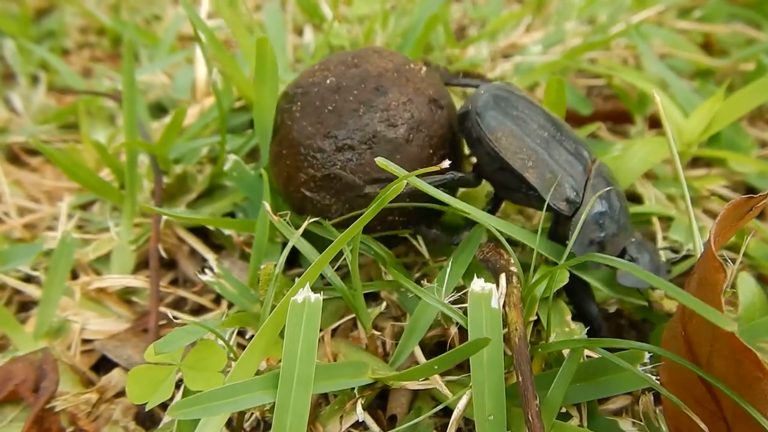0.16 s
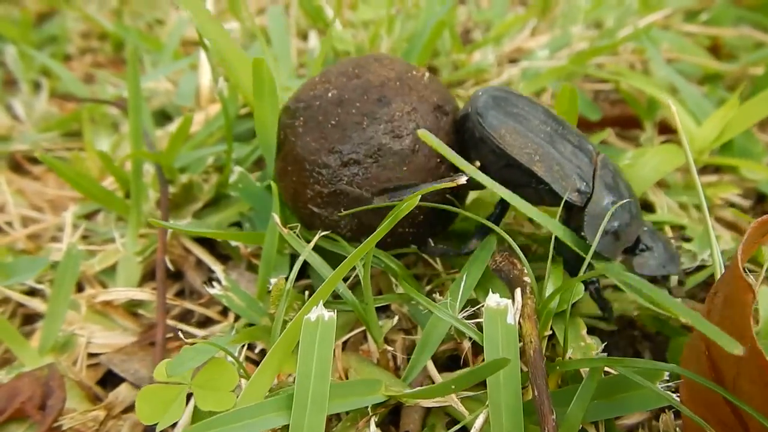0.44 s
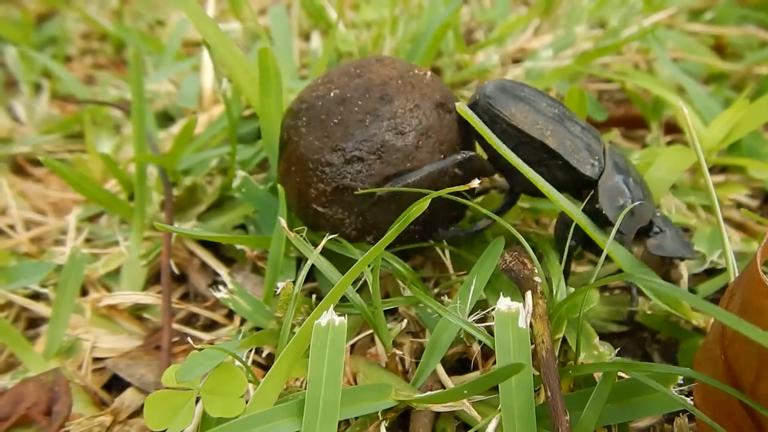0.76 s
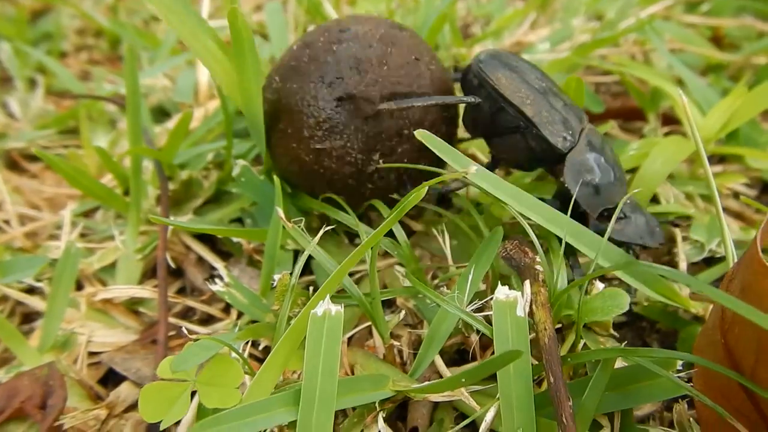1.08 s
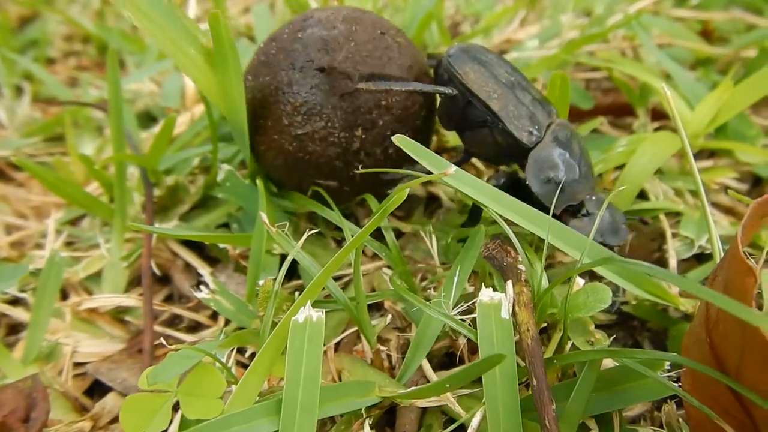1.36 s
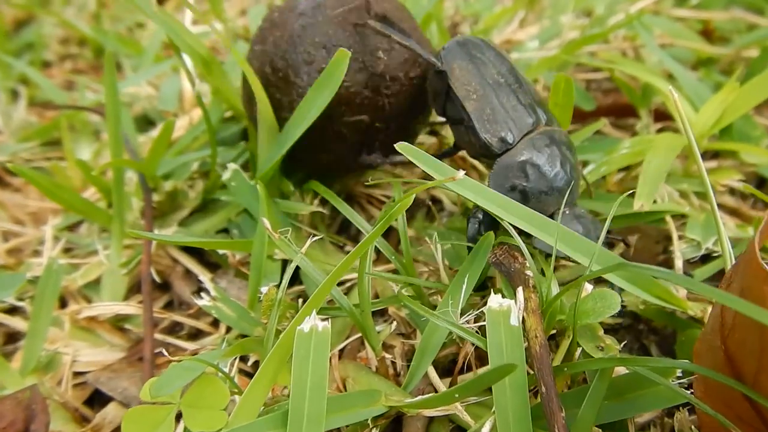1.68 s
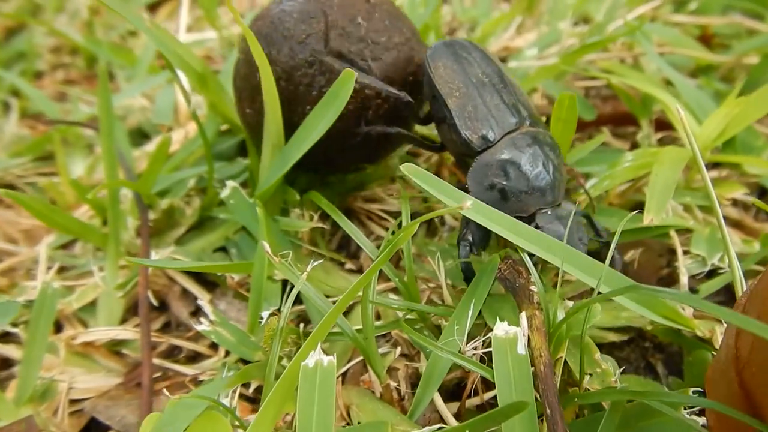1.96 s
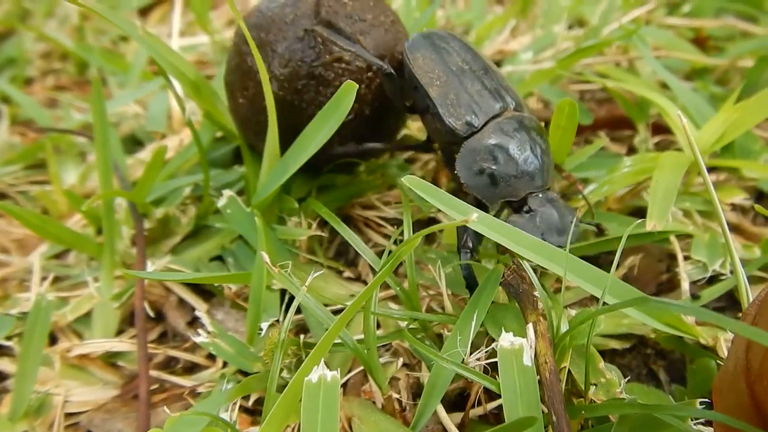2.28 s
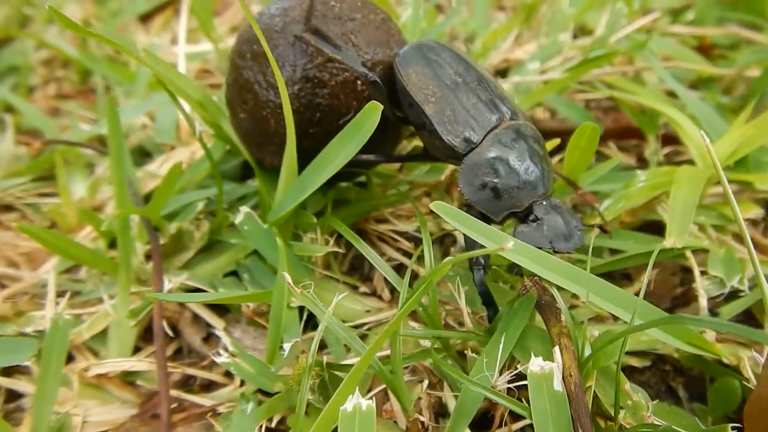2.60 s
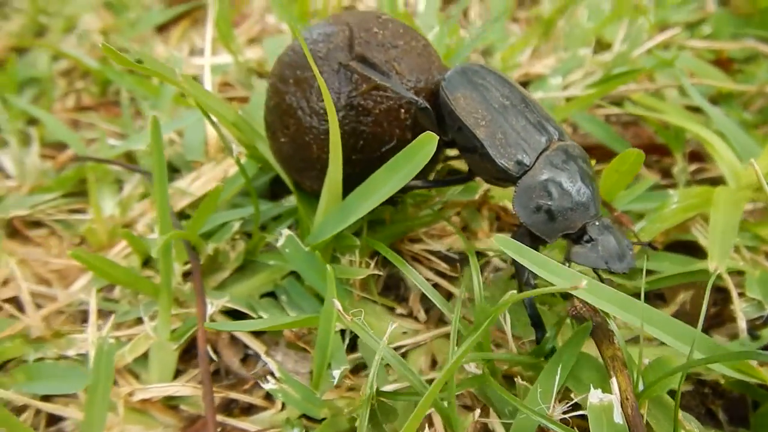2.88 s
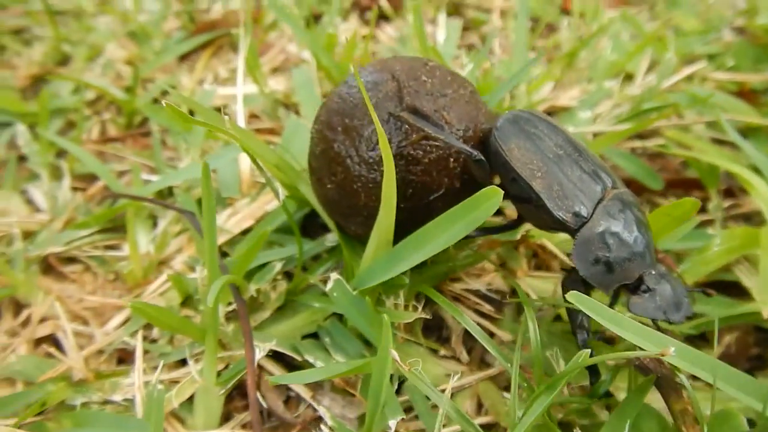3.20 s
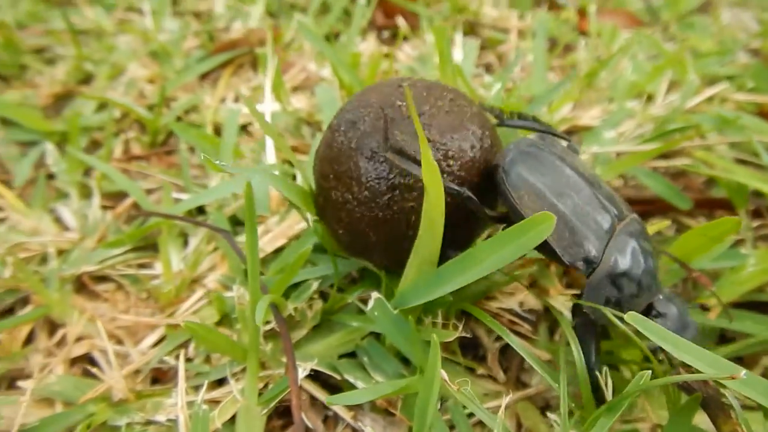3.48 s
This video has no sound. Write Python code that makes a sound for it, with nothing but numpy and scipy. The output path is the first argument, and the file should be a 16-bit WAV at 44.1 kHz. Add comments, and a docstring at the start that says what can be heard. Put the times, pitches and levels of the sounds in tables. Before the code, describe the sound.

Close to a lawn, dry grass ticks, rustles and scrapes under a beetle pushing its ball; low wind rumbles softly, a brief gust bumps the microphone after one second, and a high insect buzz swells last.

```python
"""Lawn with dung beetle and insects

Close to a lawn where a dung beetle rolls its ball. Low wind, rumble and fine hiss are coloured noise;
a gust buffets the microphone amid soft low bumps. Dry grass ticks, tocks, rustles and scrapes: clicks through
resonances, plus gritty noise. A wavering sine hums far off. In the treble: a faint chorus of band noise,
a thin gliding tone, then a nearer insect swelling into a fast, high buzz of pulses."""
import sys
import numpy as np
from scipy import signal
from scipy.fft import rfft, irfft, next_fast_len
from scipy.io import wavfile

SR = 44100
rng = np.random.default_rng(int(sys.argv[2]) if len(sys.argv) > 2 else 0)


def dump_mix(stems):
    """Bounce the given channels to the path in sys.argv[1] as a 16-bit WAV at rate SR."""
    frames = np.atleast_2d(stems).T  # one column per channel
    limited = np.clip(frames, -1, 1)  # hard clip at full scale
    pcm = np.round(limited * 32767).astype(np.int16)
    wavfile.write(sys.argv[1], SR, pcm)


N = 160965

# Noise spectra are relative: (frequency [Hz], density [dB per Hz])
# Left-right correlation of noise: (frequency [Hz], correlation [-1..1])
STEREO_CORRELATION = [(25, 1), (80, 0.89), (160, 0.95), (350, 0.7), (800, 0.62), (2500, 0.27), (6000, 0.39),
                      (12000, 0.035)]

# Steady outdoor air: (frequency [Hz], density [dB per Hz])
AIR_SPECTRUM = [(12, -60), (20, -6), (49, -8.5), (87, -2), (311, -12.5), (370, -16), (570, -21.5),
                (823, -24), (1380, -33), (1610, -36), (2480, -37.5), (3500, -38.5), (4550, -51.5),
                (7700, -120)]
# Fine hiss: (frequency [Hz], density [dB per Hz])
HISS_SPECTRUM = [(1500, -23), (2900, -3.5), (3500, -21.5), (4100, -13), (4700, 1.5), (5250, 5.5),
                 (6500, -3.5), (7400, -10), (8400, -20.5), (10500, -22), (15500, -24.5)]
AIR_DB, HISS_DB = -49, -66
# Low wind, relative to AIR_DB: (time [s], level [dB])
BREEZE_LEVEL = [(0, 1.5), (.3, -1), (.55, -1), (.74, 0), (.95, -0.5), (1.3, 1), (1.5, -1.5), (1.63, 2),
                (1.8, -1), (2.3, 0.5), (2.7, 2), (3.15, 0.5), (3.65, 2.5)]
# Gusts on the microphone: (time [s], level [dB], hold including attack [s], fade by 60 dB [s])
GUSTS = [(1.085, -34, 0.054, 0.5)]
GUST_ATTACK_S = 0.012
# Gust: (frequency [Hz], density [dB per Hz])
GUST_SPECTRUM = [(20, -22), (35, -3), (65, -3.5), (110, 2.5), (190, -6), (280, -19), (600, -63),
                 (2000, -79)]

# Deep rumble of air on each microphone port: (time [s], level [dB])
RUMBLE_LEVEL = [(0, -68), (1.0, -76), (1.15, -60), (1.4, -75), (1.95, -53.5), (2.3, -66), (3.2, -59.5),
                (3.45, -42.5), (3.65, -49)]
# Rumble: (frequency [Hz], density [dB per Hz])
RUMBLE_SPECTRUM = [(15, 11.5), (25, -18), (42, -1), (65, -3), (130, -33), (500, -62)]

# Far hum: (time [s], level [dB])
HUM_LEVEL = [(0, -76), (.7, -54.5), (1.2, -76), (2.1, -70), (2.35, -53.5), (2.65, -50), (3.0, -59.5),
             (3.65, -51)]
HUM_HZ, HUM_WANDER_FRACTION = 83.3, 0.0243

# Far insect chorus: (frequency [Hz], density [dB per Hz])
CHORUS_SPECTRUM = [(6200, -49), (6900, -1), (7200, 3), (7700, 0), (8100, -19), (8550, -16), (8900, -30)]
# Chorus: (time [s], level [dB])
CHORUS_LEVEL = [(0, -78), (.6, -85), (.8, -86), (1.05, -80), (1.55, -73), (1.8, -77), (2.35, -79),
                (2.6, -78), (3.65, -73)]
CHORUS_WAVER_DB = 1.5

# Rustle of the blades: (time [s], crisp level [dB], scuff level [dB])
RUSTLE_LEVELS = [(0, -72, -73), (.25, -65, -65), (.65, -69, -69), (.8, -62.5, -67), (1.02, -70, -68),
                 (1.12, -63, -61), (1.22, -66, -61.5), (1.45, -70, -71), (1.8, -67.5, -68.5),
                 (1.96, -61, -58.5), (2.17, -73, -72.5), (2.45, -71, -68.5), (2.6, -65, -63.5),
                 (2.95, -63, -60.5), (3.2, -68, -65), (3.33, -62, -65.5), (3.45, -62.5, -63.5),
                 (3.65, -59.5, -57.5)]
GRAINS_PER_S, GRAIN_SPREAD_DB, GRAIN_PAN_DB = 550, 3.5, 8.5
RUSTLE_PATCHY_DB, RUSTLE_PATCH_RATE_HZ = 3, 20
# Resonances of the rubbing blades: (frequency [Hz], width [Hz], gain [dB])
SCUFF_MODES = [(890, 290, -2), (1115, 240, 0), (1664, 245, 0), (2083, 450, -3.5), (2805, 490, -5)]

# Ticks of grass blades and stalks; levels before TICK_GAIN_DB:
# (time [s], thud level [dB], snap level [dB], crisp level [dB], left minus right [dB],
#  snap pitch ratio [1], crackle t60 [s])
TICKS = [(.051, -64, -56.5, -56, 0, 1.5, .03), (.091, -55, -59.5, -64, 1, 0.78, 0.023),
         (.177, -75, -59, -58, 6, 1.8, 0.026), (.198, -68, -55, -56.5, 2, 1.34, 0.023),
         (0.233, -72, -56, -52, 4, 1.54, 0.057), (0.327, -75, -57.5, -54.5, 2, 1.8, 0.014),
         (.345, -75, -77, -63, 1, 0.94, .02), (.563, -68, -63, -53.5, 1, 1.03, 0.019),
         (0.589, -58, -51.5, -63, -1, 0.79, 0.017), (.812, -64, -55.5, -56, -.5, 1, 0.045),
         (1.066, -62, -58, -49.5, 7, 1.9, 0.038), (1.084, -51, -56.5, -52.5, -1, 1.26, .025),
         (1.096, -58, -65, -48.5, 2.5, 0.77, .03), (1.114, -70, -71, -61, 2, 1.3, .03),
         (1.133, -70, -70, -59, 2, 1.27, 0.017), (1.145, -67, -74, -55.5, 9, 1.7, .035),
         (1.235, -54, -56.5, -53.5, 0, 1.75, 0.014), (1.274, -58, -67, -56.5, 6, 1.27, 0.046),
         (1.376, -73, -67, -56, 9, 1.04, 0.022), (1.517, -75, -56, -52, 1, 0.91, 0.028),
         (1.63, -45.5, -52.5, -59, -6, 0.8, 0.02), (1.863, -53.5, -56, -59.5, 5, 1.5, 0.037),
         (1.911, -67, -70, -53.5, 9, 1, 0.028), (1.937, -49, -65, -54, 1, 0.89, .015),
         (1.965, -56, -73, -54, 7, 1.2, 0.027), (1.985, -48, -55, -69, 0, 0.65, 0.071),
         (2.001, -62, -62, -55, 7, 0.76, 0.029), (2.027, -55, -51.5, -67, 4, 1, 0.042),
         (2.085, -58, -64, -53.5, 2, 0.91, 0.011), (2.11, -54, -53.5, -64, -1, 1, 0.055),
         (2.241, -55, -59, -52, 4, 2.36, 0.015), (2.256, -47.5, -50, -77, -12, 0.55, 0.045),
         (2.471, -64, -72, -59, 7, 1.2, .025), (2.929, -53, -53.5, -56, -5, 1.14, 0.088),
         (2.955, -47, -46.5, -51.5, -2.5, 1.02, 0.027), (3.087, -57, -60, -53, -1, 1.15, 0.068),
         (3.1, -77, -64, -51, 1, 1.1, .07), (3.299, -66, -54, -57, -1.5, 1, 0.079),
         (3.35, -50, -45, -59, -7, 0.88, 0.048), (3.522, -47.5, -56.5, -54.5, 0, 1, .015),
         (3.59, -53, -51, -51.5, -1, 0.72, 0.013), (3.613, -34.5, -47.5, -60, 0, 0.89, .025)]
# Low resonances of the turf: (frequency [Hz], width [Hz], gain [dB])
THUD_MODES = [(285, 170, -3), (474, 290, -2)]
# Middle resonances, before the pitch ratio: (frequency [Hz], width [Hz], gain [dB])
SNAP_MODES = [(890, 200, -2), (1550, 300, -1.5), (2030, 380, -3.5), (2870, 640, -10)]
# High resonances, of ticks and rustle: (frequency [Hz], width [Hz], gain [dB])
CRISP_MODES = [(5060, 516, 10), (6270, 1170, 2.5), (7420, 430, 1.5), (8370, 3100, -19.5)]
TICK_GAIN_DB, TICK_SAMPLES = -8.5, 2048
SPLINTERS_PER_S, SPLINTER_DB, SPLINTER_STEREO_RATIO = 3000, -7.5, 1

# Tocks of dry stalks; levels before TICK_GAIN_DB: (time [s], pitch [Hz], level [dB])
TOCKS = [(.283, 2030, -51.5), (.407, 2350, -58.5), (.515, 1740, -63.5), (2.35, 1640, -58),
         (2.513, 1550, -58), (2.586, 950, -57), (2.689, 1700, -58.5), (2.718, 1640, -64),
         (2.836, 1570, -60), (2.861, 1150, -65), (3.031, 1690, -57), (3.072, 1630, -59),
         (3.318, 1660, -53.5)]
TOCK_WIDTH_HZ, TOCK_CRACKLE_T60_S = 240, .022

# One blade scrapes as the gust arrives: (frequency [Hz], density [dB per Hz])
SCRAPE_SPECTRUM = [(2500, -18), (4400, -22), (5400, 7), (6200, -12), (7600, 0.5), (9000, -10),
                   (10600, -21.5), (12000, -42), (16000, -54)]
SCRAPE_PEAK_S, SCRAPE_DB, SCRAPE_ATTACK_S, SCRAPE_T60_S = 1.097, -44, 0.0064, 0.087

# Soft low bumps: (time [s], pitch [Hz], envelope peak [dB])
BUMPS = [(1.101, 106, -29.5), (1.125, 115, -29), (1.16, 90, -29), (1.195, 83.4, -33.5), (2.65, 202, -38),
         (2.898, 293, -40), (3.257, 285, -35.5), (3.376, 240, -39), (3.407, 83, -32.5), (3.538, 109, -53)]
BUMP_RISE_CYCLES = 0.52

# Far insect: (time [s], pitch [Hz], level [dB])
THIN_TONE = [(2.05, 10080, -104), (2.25, 9930, -96), (2.5, 9940, -91), (2.65, 10000, -102),
             (2.9, 9814, -92.5), (3.2, 9780, -87.5), (3.65, 9630, -85)]
THIN_WANDER_FRACTION = 0.0113

# Near insect, before pan and rasp: (time [s], level [dB])
BUZZ_LEVEL = [(3.0, -86), (3.24, -88), (3.3, -70), (3.335, -69), (3.36, -55.5), (3.385, -71), (3.405, -61),
              (3.42, -63), (3.455, -55.5), (3.5, -56), (3.53, -50), (3.55, -52.5), (3.573, -47.5),
              (3.61, -51.5), (3.635, -48), (3.65, -51)]
# Its pitch, which also sets the pulse rate: (time [s], pitch [Hz])
BUZZ_PITCH = [(3.33, 9640), (3.43, 9400), (3.47, 9540), (3.52, 9640), (3.59, 9620), (3.65, 9440)]
CYCLES_PER_PULSE, PULSE_SLIP_RAD, PULSE_JITTER_FRACTION, PULSE_SPREAD_DB = 22.75, .62, 0.00583, 1.2
BUZZ_PAN_DB, BUZZ_RIGHT_LEAD_S = -5, .000015
# Rasp round the ringing tone: (frequency [Hz], density [dB per Hz])
RASP_SPECTRUM = [(7000, -19), (8500, -12), (9050, -1), (9250, -4), (9800, 3), (10050, -9), (10450, -4),
                 (11300, -19), (11700, -11), (12000, -17), (13200, -52)]
RASP_GAIN, RASP_PAN_DB = 0.36, 12
# Its two upper bands: (frequency [Hz], density [dB per Hz])
OVERTONE_SPECTRUM = [(11450, -28), (11730, -5), (12000, -22), (12300, -4), (12600, -2), (12850, -17),
                     (13200, -45)]
# Upper bands, before pan and pulsing: (time [s], level [dB])
OVERTONE_LEVEL = [(3.0, -110), (3.26, -92), (3.33, -78), (3.45, -73), (3.58, -68.5), (3.65, -69)]
OVERTONE_PAN_DB = 10

# Narrow gaps in the microphone's response: (frequency [Hz], width [Hz])
NOTCHES = [(2500, 178), (5000, 120), (7500, 71)]
CUTOFF_HZ = 15700


def from_db(db):
    """Decibels to gain."""
    return 10 ** (np.asarray(db) / 20)


def rms_one(x):
    """Scale to rms 1."""
    return x / np.sqrt(np.mean(x ** 2) + 1e-30)


def in_time(rows):
    """Each column of a curve at every sample."""
    s, *columns = np.transpose(rows)
    return [np.interp(np.arange(N) / SR, s, column) for column in columns]


def at_hz(points, hz):
    """Read a spectrum on a log-frequency axis."""
    f, value = np.transpose(points)
    return np.interp(np.log(hz + 1), np.log(f), value)


def panned(db):
    """Left and right gains for a left-minus-right level."""
    return from_db(np.array([[.5], [-.5]]) * db)


def drift(rate_hz):
    """Slow chance of rms 1: noise through a double pole, computed every 40 samples."""
    step = 40
    r = np.exp(-2 * np.pi * rate_hz * step / SR)
    white = rng.standard_normal(N // step + 2002)
    slow = signal.lfilter([1], [1, -2 * r, r * r], white)[2000:]  # drop the settling
    return np.interp(np.arange(N) / step, np.arange(len(slow)), rms_one(slow))


def noise(spectrum):
    """Coloured stereo noise, alike in the bass and diffuse in the treble; rms 1."""
    size = next_fast_len(N)
    hz = np.arange(size // 2 + 1) * SR / size
    mid, side = rfft(rng.standard_normal((2, size)))
    alike = np.clip(at_hz(STEREO_CORRELATION, hz), -1, 1)
    both = np.sqrt(1 + alike) * mid + np.sqrt(1 - alike) * side * [[1], [-1]]
    gain = (hz > 14) * from_db(at_hz(spectrum, hz))
    return rms_one(irfft(both * gain, size)[:, :N])


def resonate(x, modes):
    """Parallel resonances with alternating signs, low-passed above the last one."""
    out = 0
    for k, (hz, width_hz, db) in enumerate(modes):
        r = np.exp(-np.pi * width_hz / SR)
        b = (1 - r * r) / 2
        poles = [1, -2 * r * np.cos(2 * np.pi * hz / SR), r * r]
        ring = signal.lfilter([b, 0, -b], poles, x + 1e-18)
        out = out + (-1) ** k * from_db(db) * ring
    top_hz = min(modes[-1][0] * 1.233, SR / 3)
    return signal.sosfilt(signal.butter(4, top_hz, fs=SR, output="sos"), out)


def crackle(t60_s):
    """A click, then a dying spray of separate splinters."""
    t = np.arange(TICK_SAMPLES) / SR
    born = rng.random(TICK_SAMPLES) < SPLINTERS_PER_S / SR
    common = rng.standard_normal(TICK_SAMPLES)
    sizes = common + SPLINTER_STEREO_RATIO * rng.standard_normal((2, TICK_SAMPLES))
    return (t == 0) + born * sizes * from_db(SPLINTER_DB - 60 * t / t60_s)


def add(out, s, db, ring):
    """Mix one short ring in at its time and level."""
    i = int(s * SR)
    out[:, i:i + TICK_SAMPLES] += (from_db(db + TICK_GAIN_DB) * rms_one(ring))[:, :N - i]


def wind():
    """Low steady air, fine hiss and short gusts on the microphone, all coloured noise."""
    breeze_db, = in_time(BREEZE_LEVEL)
    t, gust_gain = np.arange(N) / SR, 0
    for s, db, hold_s, fade_s in GUSTS:
        attack = np.clip((t - s) / GUST_ATTACK_S, 0, 1)
        gust_gain = gust_gain + attack * from_db(db - 60 * np.maximum(t - s - hold_s, 0) / fade_s)
    air = from_db(AIR_DB + breeze_db) * noise(AIR_SPECTRUM)
    hiss = from_db(HISS_DB + .5 * drift(24)) * noise(HISS_SPECTRUM)
    return air + hiss + gust_gain * noise(GUST_SPECTRUM)


def rumble():
    """Independent deep noise at each microphone port."""
    db, = in_time(RUMBLE_LEVEL)
    left, right = noise(RUMBLE_SPECTRUM)[0], noise(RUMBLE_SPECTRUM)[1]
    return from_db(db) * np.array([left, right])


def hum():
    """A low far drone: one sine wavering in pitch and level."""
    db, = in_time(HUM_LEVEL)
    hz = HUM_HZ * (1 + HUM_WANDER_FRACTION * drift(3.62))
    return np.sqrt(2) * from_db(db + 1.2 * drift(21)) * np.sin(2 * np.pi * np.cumsum(hz) / SR)


def chorus():
    """Distant insects blurred into a faint noise band that swells and fades."""
    db, = in_time(CHORUS_LEVEL)
    waver_db = CHORUS_WAVER_DB * np.clip(drift(3.3), -2, 1.5)
    return from_db(db + waver_db) * noise(CHORUS_SPECTRUM)


def rustle():
    """Dense tiny clicks of rubbing blades, scattered in pan; each resonance comes and goes in clumps."""
    out = 0
    for db, modes in zip(in_time(RUSTLE_LEVELS), (CRISP_MODES, SCUFF_MODES)):
        layer = 0
        for mode in modes:
            born = rng.random(N) < GRAINS_PER_S / SR
            grain_db = GRAIN_SPREAD_DB * np.minimum(rng.exponential(1, N), 4)
            patch_db = RUSTLE_PATCHY_DB * np.clip(drift(RUSTLE_PATCH_RATE_HZ), -2, 2)
            clicks = born * from_db(grain_db + patch_db) * rng.choice([-1, 1], N)
            layer = layer + resonate(clicks * panned(GRAIN_PAN_DB * rng.standard_normal(N)), [mode])
        out = out + from_db(db) * rms_one(layer)
    return out


def ticks():
    """Each crackle has its own decay and rings in the turf; the snap's pitch depends on the blade."""
    out = np.zeros((2, N))
    for s, thud_db, snap_db, crisp_db, pan_db, ratio, t60_s in TICKS:
        burst = crackle(t60_s) * panned(pan_db)
        snap = [(hz * ratio, width_hz, db) for hz, width_hz, db in SNAP_MODES]
        for db, modes in ((thud_db, THUD_MODES), (snap_db, snap), (crisp_db, CRISP_MODES)):
            add(out, s, db, resonate(burst, modes))
    return out


def tocks():
    """A flicked stalk: a crackle through one resonance rings briefly at one pitch."""
    out = np.zeros((2, N))
    for s, hz, db in TOCKS:
        add(out, s, db, resonate(crackle(TOCK_CRACKLE_T60_S), [(hz, TOCK_WIDTH_HZ, 0)]))
    return out


def scrape():
    """A short bright slide of one blade: noise made gritty by fast level flicker."""
    t = np.arange(N) / SR - SCRAPE_PEAK_S
    rise = np.exp(np.minimum(t, 0) / SCRAPE_ATTACK_S)
    shape = rise * from_db(SCRAPE_DB - 60 * np.maximum(t, 0) / SCRAPE_T60_S)
    grit = rms_one(from_db(6.1 * drift(230)))
    return shape * grit * noise(SCRAPE_SPECTRUM) * panned(3.6)


def bumps():
    """Soft knocks: sines that swell and die within about two cycles."""
    out = 0
    for s, hz, db in BUMPS:
        cycles = np.maximum(np.arange(N) / SR - s, 0) * hz
        age = np.minimum(cycles / BUMP_RISE_CYCLES, 20)
        envelope = (age * np.exp(1 - age)) ** 2  # peaks at age 1
        out = out + from_db(db) * envelope * np.sin(2 * np.pi * cycles)
    return out


def far_insect():
    """A thin sine, unsteady in pitch and level, that sinks slowly."""
    hz, db = in_time(THIN_TONE)
    phase = 2 * np.pi * np.cumsum(hz * (1 + THIN_WANDER_FRACTION * drift(297))) / SR
    tone = np.sqrt(2) * from_db(db + 2.7 * drift(25)) * np.sin(phase)
    started = np.arange(N) > THIN_TONE[0][0] * SR
    return tone * panned(16) * started


def near_insect():
    """Fast short swells, each restarting one high gliding tone, with rasp and two upper bands."""
    t = np.arange(N) / SR
    (db,), (hz,), (upper_db,) = in_time(BUZZ_LEVEL), in_time(BUZZ_PITCH), in_time(OVERTONE_LEVEL)
    pulse_hz = hz / CYCLES_PER_PULSE * (1 + PULSE_JITTER_FRACTION * drift(75.4))
    pulse_count = np.cumsum(pulse_hz) / SR
    which, age = pulse_count.astype(int), pulse_count % 1
    pulse_gain = from_db(PULSE_SPREAD_DB * rng.standard_normal(N)[which])
    pulse = rms_one(np.sin(np.pi * age) * pulse_gain)
    phase = 2 * np.pi * CYCLES_PER_PULSE * age + PULSE_SLIP_RAD * rng.standard_normal(N)[which]
    right_lead = 2 * np.pi * hz * BUZZ_RIGHT_LEAD_S * np.array([[0], [1]])
    tone = np.sqrt(2) * np.sin(phase + right_lead) * panned(BUZZ_PAN_DB)
    rasp = RASP_GAIN * noise(RASP_SPECTRUM) * panned(RASP_PAN_DB)
    song = from_db(db) * (tone + rasp)
    upper = from_db(upper_db) * noise(OVERTONE_SPECTRUM) * panned(OVERTONE_PAN_DB)
    fade_in = np.clip((t - BUZZ_LEVEL[0][0]) * 10, 0, 1)  # 0.1 s
    return fade_in * (pulse * song + (.5 + .5 * pulse) * upper)


def scene():
    """Wind, grass and insects together."""
    air = wind() + rumble() + hum()
    grass = rustle() + ticks() + tocks() + scrape()
    insects = chorus() + far_insect() + near_insect()
    return air + grass + bumps() + insects


def record(dry):
    """Narrow notches in the microphone's response; the top is cut steeply."""
    for hz, width_hz in NOTCHES:
        dry = signal.lfilter(*signal.iirnotch(hz, hz / width_hz, fs=SR), dry)
    return signal.sosfilt(signal.ellip(10, .1, 70, CUTOFF_HZ, fs=SR, output="sos"), dry)


dry = scene()
out = record(dry)
dump_mix(out)
```